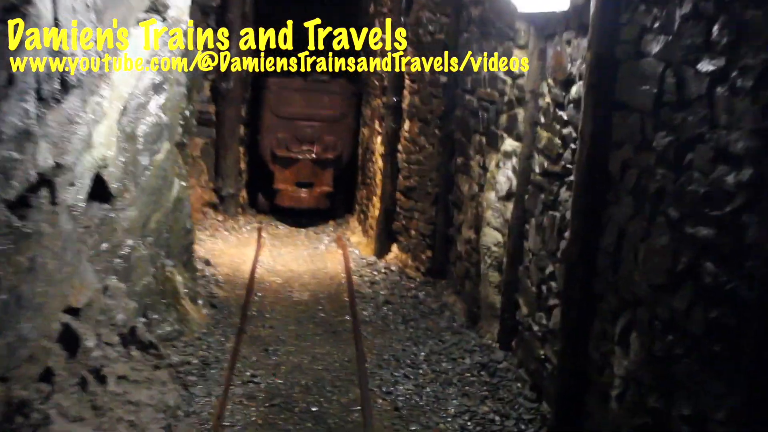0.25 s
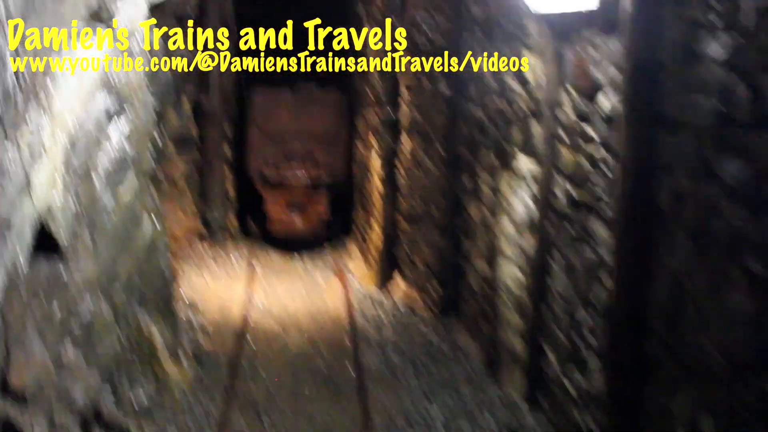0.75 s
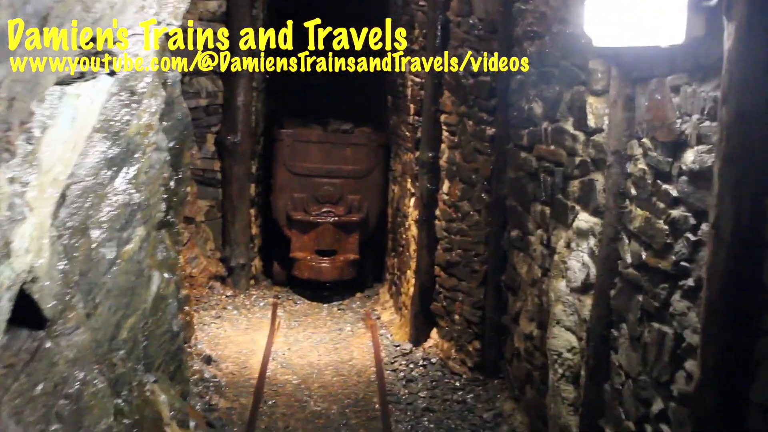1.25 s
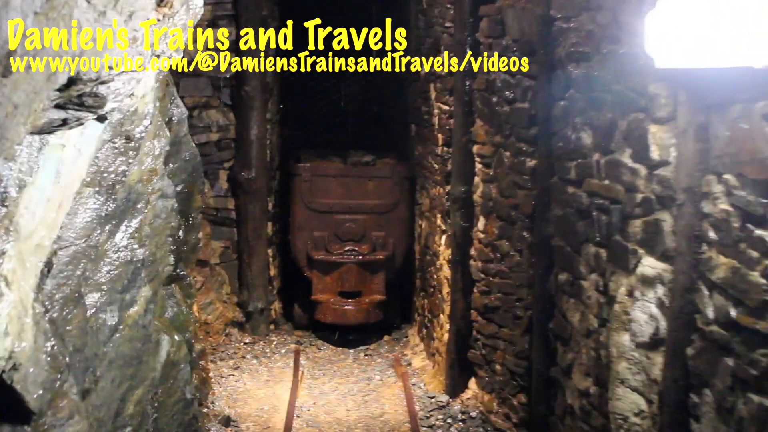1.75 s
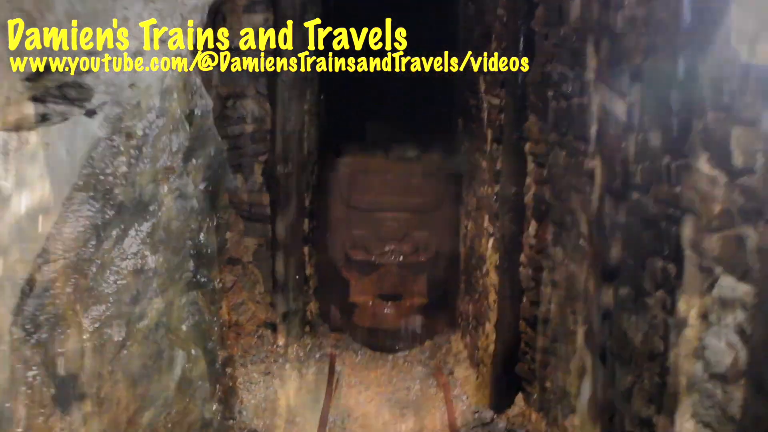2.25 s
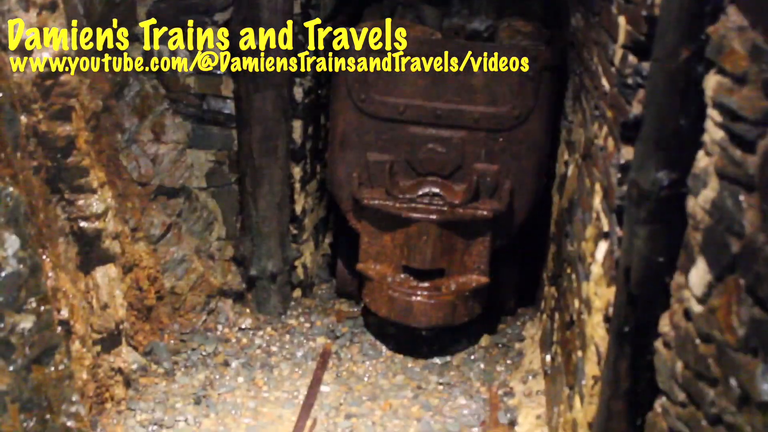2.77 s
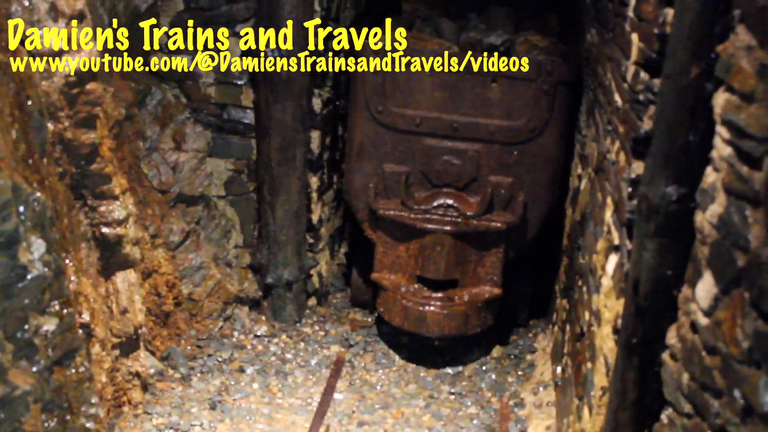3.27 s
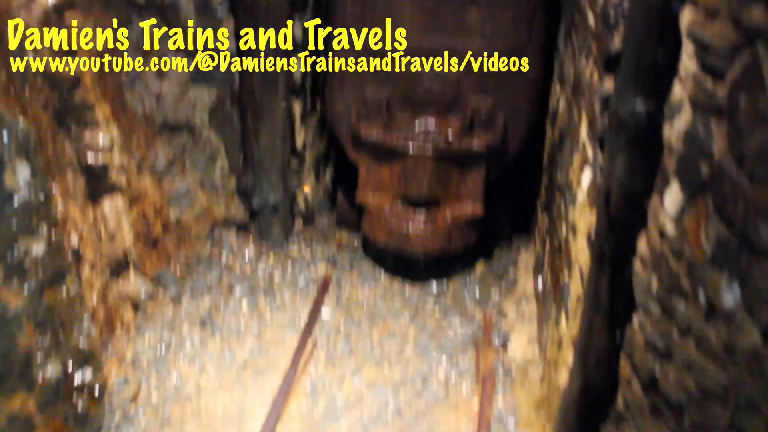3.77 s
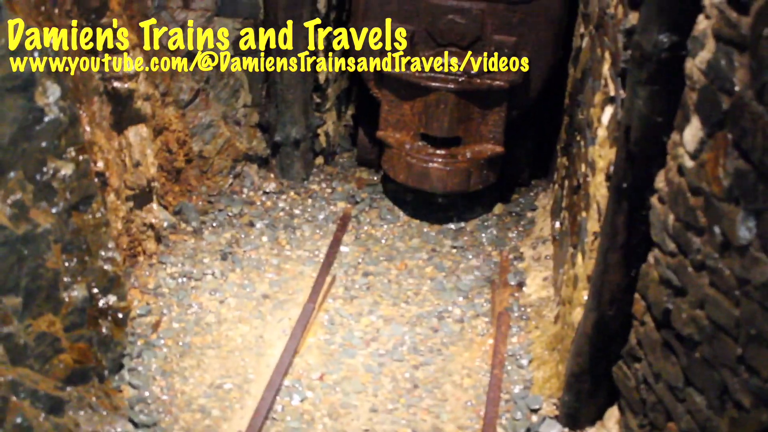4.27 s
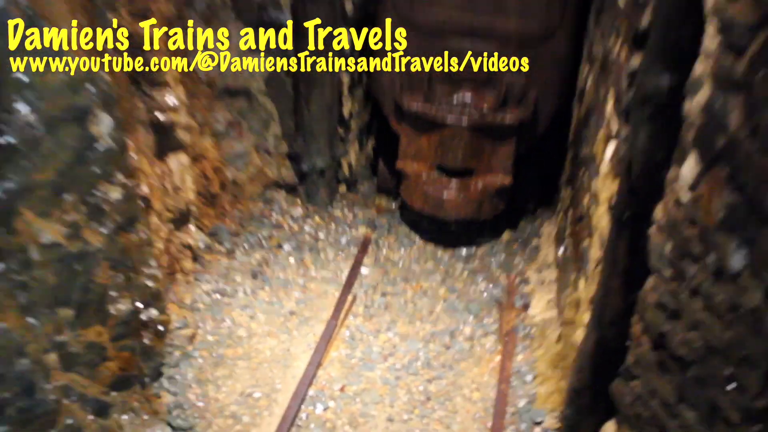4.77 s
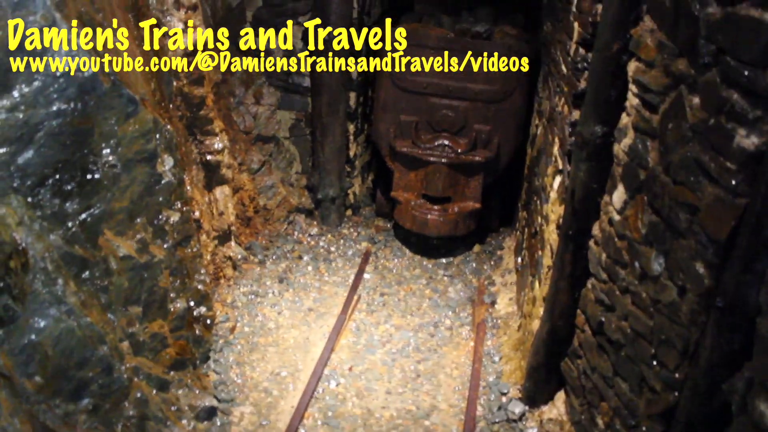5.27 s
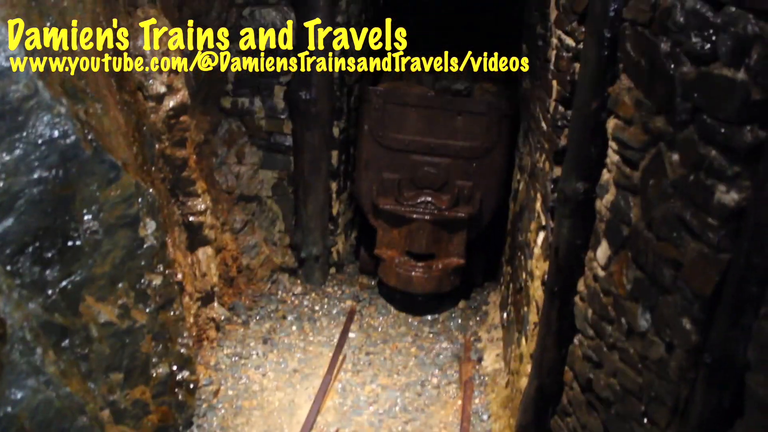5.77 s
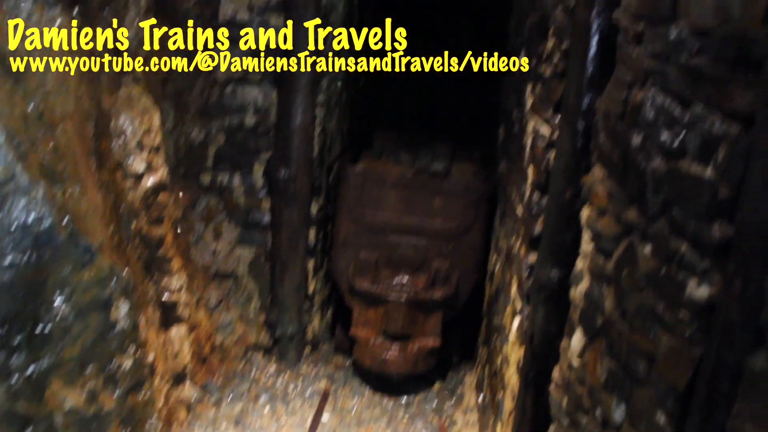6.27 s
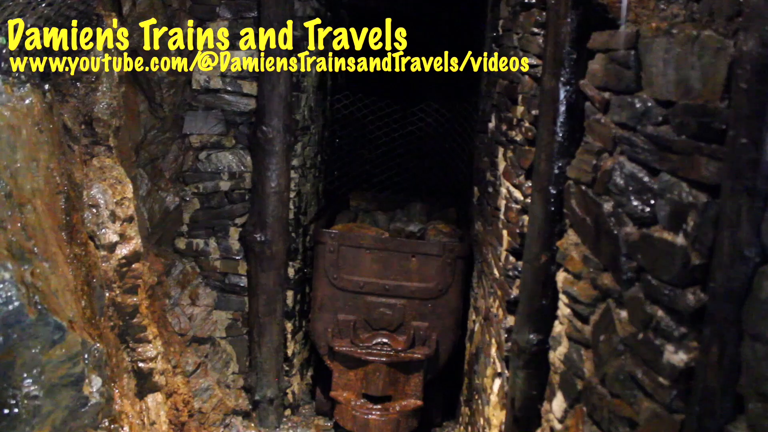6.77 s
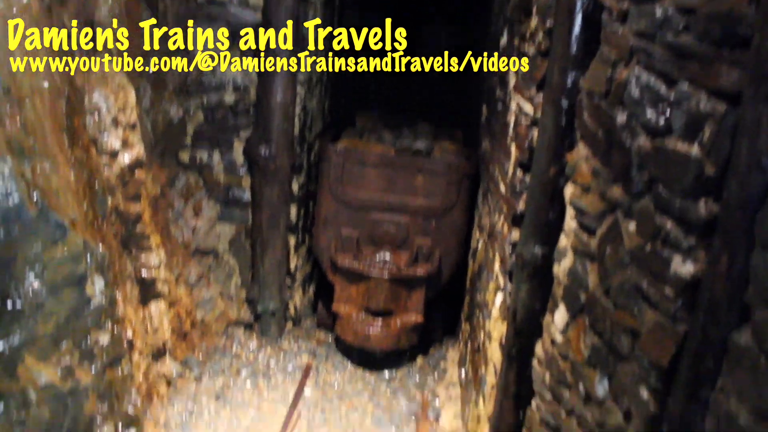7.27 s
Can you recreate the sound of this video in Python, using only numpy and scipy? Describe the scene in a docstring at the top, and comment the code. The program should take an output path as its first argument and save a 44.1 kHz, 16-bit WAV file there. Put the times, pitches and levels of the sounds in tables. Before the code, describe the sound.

Splashing steps on wet gravel open the scene for about two seconds, then stop. Irregular water drops take over, sharp ticks on stone and small rising plinks in puddles, over a soft wash of distant dripping. One loud drop and muffled handling knocks come past the middle; light scuffs and busier drips end it. Mono handheld camera, tight reverberant tunnel.

```python
"""Water drips in a narrow stone mine tunnel: noise bursts smack on rock and gravel, rising sines plink in puddles.
Four splashing steps on wet gravel, then soft scuffs and a spatter, are built from clouds of tiny decaying grains.
Fingers bump (damped sines, noise thuds) and rub (filtered noise) the camera; low noise is air at the microphone.
Close walls answer drips and steps at once, the long bore rings longer; far drips merge into a soft wash."""
import sys
import numpy as np
from scipy import signal
from scipy.fft import rfft, irfft, next_fast_len
from scipy.io import wavfile
from scipy.ndimage import map_coordinates

SR = 44100
rng = np.random.default_rng(int(sys.argv[2]) if len(sys.argv) > 2 else 0)


def persist_wave(psi):
    """Save psi, clipped to +-1, as 16-bit WAV."""
    counts = np.round(np.clip(psi, -1, 1) * 32767).astype(np.int16)
    wavfile.write(sys.argv[1], SR, np.atleast_2d(counts).T)


N = 332073
TOP_HZ = 15900  # upper limit of grain pitch and of the camera's band
STEP_HOLD = 0.09  # share of a step's length spent at full weight


def amp(db):
    """Decibels to gain."""
    return 10 ** (np.asarray(db) / 20)


def unit(x):
    """x at rms 1."""
    return x / np.sqrt(np.mean(x ** 2) + 1e-20)


def along(points, hz):
    """(Hz, value) points interpolated on a log frequency axis."""
    point_hz, value = np.transpose(points)
    return np.interp(np.log(hz + 1), np.log(point_hz), value)


def level_curve(rows, outside_db=None):
    """Gain per sample from (s, dB) rows, interpolated in dB."""
    s, db = np.transpose(rows)
    return amp(np.interp(np.arange(N) / SR, s, db, outside_db, outside_db))


def wobble(knots_per_s):
    """A smooth random curve through normally distributed knots."""
    knots = rng.standard_normal(int(N * knots_per_s / SR) + 4)
    return map_coordinates(knots, [np.arange(N) * knots_per_s / SR])


def filtered(x, response):
    """x times a response of frequency."""
    size = next_fast_len(len(x) + SR // 4)
    spectrum = rfft(x, size) * response(np.fft.rfftfreq(size, 1 / SR))
    return irfft(spectrum, size)[:len(x)]


def coloured(x, spectrum):
    """x shaped by (Hz, dB) points, at rms 1."""
    return unit(filtered(x, lambda hz: amp(along(spectrum, hz))))


def add(track, s, sound):
    """Mix a sound into the track at time s."""
    part = track[max(round(s * SR), 0):][:len(sound)]
    part += sound[:len(part)]


def at_level(sound, db):
    """Scale a sound so that its first 20 ms have this rms level."""
    return amp(db) * sound / np.sqrt(np.mean(sound[:SR // 50] ** 2))


def dying(t60s):
    """Half a second of noise echo with energy 1; each frequency dies at its own speed."""
    hz, age_s, z = signal.stft(rng.standard_normal(SR // 2), SR, nperseg=256)
    decay = amp(-60 * age_s / along(t60s, hz)[:, None])
    tail = signal.istft(z * decay, SR, nperseg=256)[1]
    return tail / np.linalg.norm(tail)


def tunnel(direct_db, bore_db=-5):
    """Echo path from one spot: direct sound, a quick flurry off the close walls, the longer ring of the bore."""
    # Each row: frequency in Hz, t60 in seconds.
    wall_t60s = [(500, 0.14), (3000, 0.19), (7000, 0.12), (15000, 0.12)]
    bore_t60s = [(200, 0.55), (1000, 0.27), (3500, 0.37), (8000, 0.56), (15000, 0.15)]
    path = dying(wall_t60s) + amp(bore_db) * dying(bore_t60s)
    path[0] += amp(direct_db)
    return path


def standing_waves(x):
    """Resonances across the narrow section add to a few low pitches."""
    # Each row: centre in Hz, width in Hz, added peak in dB.
    cross_modes = [(108.4, 8.4, 11), (323, 12.3, -1), (600, 11.4, -24), (849, 102, 1), (944, 47, -1),
                   (1082, 15, -7)]

    def response(f):
        total = 1
        for hz, width_hz, db in cross_modes:
            damping = 1j * f * width_hz
            total = total + amp(db) * damping / (hz * hz - f * f + damping)
        return total

    return filtered(x, response)


def grains(rate_per_s, low_hz, spread_db, direct_db, cycles=2.3, spots=4):
    """Random tiny impacts, each with its own brief pitch and size, from several spots in the tunnel."""
    out, k = np.zeros(N), np.arange(256)
    for _ in range(spots):
        draws = rng.random((int(rate_per_s * N / SR / spots), 4))
        when, pitch, chance, phase = draws.T[:, :, None]
        hz = low_hz * (TOP_HZ / low_hz) ** pitch
        # high grains are fewer per Hz and shorter, so they are made stronger
        size = hz * amp(spread_db * np.minimum(-np.log(1 - chance), 3))
        turns = hz * k / SR
        envelope = np.exp(-turns / cycles) * (1 - k / len(k))
        ring = size * np.sin(2 * np.pi * (turns + phase)) * envelope
        ticks = np.bincount(((when * N).astype(int) + k).ravel(), ring.ravel(), N)[:N]
        out += signal.fftconvolve(ticks, tunnel(direct_db))[:N]
    return unit(out)


def plink(hz, cycles=23, rise=0.38, swell_cycles=1.44):
    """A trapped air bubble swells, rings and climbs in pitch as it nears the surface."""
    turns = hz * np.arange(SR // 12) / SR
    age = turns / cycles
    pitch = 1 + rise * (np.minimum(age, 1) - 1 / 4)  # hz is passed at age 1/4
    envelope = amp(-32 * age) * (1 - np.exp(-turns / swell_cycles))
    return np.sin(2 * np.pi * np.cumsum(pitch) * hz / SR) * envelope


def bubbles(table, direct_db, trim_db):
    """Ring each bubble along its own echo path."""
    out = np.zeros(N)
    for s, db, hz in table:
        heard = signal.fftconvolve(plink(hz), tunnel(direct_db, bore_db=-5.5))
        add(out, s, at_level(heard, db + trim_db))
    return out


def swell(s, rise_db_per_s, hold_s, fall_db_per_s):
    """A gain that rises to 1 at time s, holds, then dies away."""
    t = np.arange(N) / SR - s
    rise_db = rise_db_per_s * np.minimum(t, 0)
    fall_db = fall_db_per_s * np.maximum(t - hold_s, 0)
    return amp(np.maximum(rise_db - fall_db, -120))


def stroke(s, build_s, release_s, edge_db=-17):
    """A rounded gain peaking at 1 at time s, at edge_db one build-up before and one release after."""
    t = np.arange(N) / SR - s
    return amp(np.maximum(edge_db * (t / np.where(t < 0, build_s, release_s)) ** 2, -120))


def tread(s, length_s):
    """Weight comes down fast, is full at time s and eases off; loose stones shift faintly around it."""
    # rises and falls in dB per step length
    rise_db, fall_db, settle_fall_db, settle_peak_db = 61, 20.5, 8, -11.5
    hold_s = STEP_HOLD * length_s
    press = swell(s, rise_db / length_s, hold_s, fall_db / length_s)
    settle = swell(s, 2 * settle_fall_db / length_s, hold_s, settle_fall_db / length_s)
    return np.hypot(press, amp(settle_peak_db) * settle)


def air():
    """Air stirs against the microphone: low noise with a wandering level."""
    # Each row: time in seconds, level in dB, around which the level wanders.
    sway_level = [(0, -48), (1.8, -47.5), (2.6, -56), (5.3, -48.5), (6.1, -53), (7.53, -52.5)]
    # Each row: frequency in Hz, gain in dB.
    rumble_spectrum = [(6, -24.5), (14, 1), (24, -6.5), (40, -18), (70, -15.5), (170, -21), (300, -36),
                       (700, -64)]
    rumble = coloured(rng.standard_normal(N), rumble_spectrum)
    return level_curve(sway_level) * amp(1.6 * wobble(3.22)) * rumble


def wash(murmur_trim_db=-2.0, patter_trim_db=-1.5, hiss_trim_db=-6):
    """Far dripping: a hollow noise murmur, a fine patter of grains and a smooth hiss."""
    # Each row: time in seconds, level in dB before the trims.
    murmur_level = [(0.0, -46), (1.2, -47.5), (1.5, -43.5), (2.3, -48), (2.82, -52.5), (3.55, -49),
                    (3.9, -54), (4.35, -45), (4.68, -57), (5.8, -55.5), (6.3, -49.5), (6.75, -47),
                    (7.53, -55.5)]
    patter_level = [(0, -44), (1.1, -52), (1.6, -47), (2.4, -51.5), (3.5, -46.5), (3.8, -53), (4.3, -47),
                    (5.3, -50.5), (6.9, -47), (7.53, -49.5)]
    # Each row: frequency in Hz, gain in dB.
    murmur_spectrum = [(70, -20.5), (160, -0.5), (240, 0), (400, 0.5), (680, -0.5), (850, -1.5),
                       (1000, -1.5), (1250, -3), (1700, -2.5), (3000, -24)]
    patter_spectrum = [(900, -8.5), (1700, -6), (2500, 0.5), (3400, 2), (5000, -1), (7000, -4.5),
                       (11000, -6.5), (16000, -10)]
    murmur = amp(murmur_trim_db + wobble(8.4)) * coloured(rng.standard_normal(N), murmur_spectrum)
    ticking = grains(rate_per_s=260, low_hz=1225, spread_db=3, direct_db=-7.5)
    patter = amp(patter_trim_db) * coloured(ticking, patter_spectrum)
    hiss = amp(hiss_trim_db) * coloured(rng.standard_normal(N), patter_spectrum)
    return level_curve(murmur_level) * murmur + level_curve(patter_level) * (patter + hiss)


def handling(attack_s=0.001, ring_trim_db=1, thud_trim_db=-4, thud_t60_s=0.061):
    """Finger bumps (damped modes, noise thuds) and a rub reach the microphone through the housing, no echo."""
    # Each row: start in seconds, level in dB before the trims, pitch in Hz, t60 in seconds.
    bump_rows = [(3.733, -30.5, 94.4, 0.15), (3.735, -37, 317, 0.14), (4.313, -36, 49.5, 0.38),
                 (4.382, -29.5, 93, 0.21), (4.385, -31, 294, 0.032), (5.053, -16.5, 240, 0.051),
                 (5.078, -22.5, 190, 0.066), (5.259, -42.5, 101, 0.18), (6.704, -29, 103, 0.13),
                 (6.703, -29, 180, 0.039)]
    # Each row: time in seconds, level in dB of a finger sliding on the housing.
    rub_level = [(4.66, -47), (4.73, -39.5), (5.04, -42), (5.12, -58)]
    # Each row: frequency in Hz, gain in dB.
    finger_spectrum = [(30, 2), (90, -8), (150, 1), (200, 1.5), (260, 1), (340, -13.5), (600, -24),
                       (1500, -37)]
    noise_gain = level_curve(rub_level, outside_db=-120)
    rings, t = np.zeros(N), np.arange(SR // 3) / SR
    onset = 1 - np.exp(-t / attack_s)
    for s, db, hz, t60_s in bump_rows:
        ring = amp(db + ring_trim_db - 60 * t / t60_s) * np.sin(2 * np.pi * hz * t)
        add(rings, s, ring * onset)
        thud_gain = amp(db + thud_trim_db - 60 * t / min(t60_s, thud_t60_s))
        add(noise_gain, s, thud_gain * onset)
    return rings + noise_gain * coloured(rng.standard_normal(N), finger_spectrum)


def footsteps(spray_rise_db=300, spray_fall_db=26):
    """The sole slaps into wet gravel, stones grind together, water squelches and sprays out; soft scuffs follow."""
    # Each row: moment of full weight in seconds, sole, gravel crunch and spray levels in dB,
    # crunch and spray delays in seconds, length in seconds.
    step_rows = [(0.144, -29.5, -28, -35.5, 0.0057, -0.029, 0.21),
                 (0.804, -32.5, -27, -39, 0.027, 0.0077, 0.17),
                 (1.421, -37.5, -34, -40.5, 0.0059, -0.032, 0.26),
                 (2.134, -38.5, -33, -44.5, 0.0, -0.015, 0.087)]
    # Soft scuffs of shoes on gravel; the one at 4.84 s is spatter after the loud drop.
    # Each row: strongest moment in seconds, low and high grain levels in dB,
    # build-up and release in seconds.
    soft_rows = [(3.04, -44, -48.5, 0.17, 0.13), (4.159, -40, -40, 0.072, 0.11),
                 (4.84, -49, -45, 0.15, 0.2), (5.05, -43, -48, 0.06, 0.083),
                 (6.355, -42.5, -48.5, 0.075, 0.11), (6.725, -41.5, -62, 0.033, 0.2),
                 (7.115, -39.5, -44, 0.095, 0.087)]
    # Water with trapped air squeezed from under the sole.
    # Each row: start in seconds, level in dB before the trim, nominal pitch in Hz.
    squelch_rows = [(0.151, -30.5, 996), (0.197, -27, 1157), (0.220, -29, 1560), (0.276, -36, 2700),
                    (0.807, -24, 2260), (0.852, -27, 2570), (1.411, -33, 3650), (1.433, -36, 970)]
    # Each row: frequency in Hz, gain in dB.
    sole_spectrum = [(80, -34), (200, -9.5), (450, -4.5), (680, -1.5), (850, -5), (1050, -5), (1300, -9),
                     (1700, -7.5), (2400, -13), (6000, -60)]
    crunch_spectrum = [(900, -2), (1700, -10), (2300, 0.5), (3400, 1), (5200, -5), (7000, -13.5),
                       (10000, -23)]
    spray_spectrum = [(3500, -2), (6500, 2), (8000, -2.5), (10500, -1), (13000, -11), (16000, -14)]
    scuff_spectrum = [(100, -8.5), (300, -5), (600, 0), (880, -2.5), (1300, -5.5), (2400, -10),
                      (4500, -14.5), (8000, -25.5), (15000, -27)]
    sole = coloured(grains(rate_per_s=1200, low_hz=197.0, spread_db=3.0, direct_db=-5), sole_spectrum)
    crunch = coloured(grains(rate_per_s=800, low_hz=1200, spread_db=4, direct_db=-1), crunch_spectrum)
    spray = coloured(grains(rate_per_s=800, low_hz=4500, spread_db=3, direct_db=-3), spray_spectrum)
    scuff = coloured(grains(rate_per_s=1400, low_hz=258, spread_db=7.0, direct_db=-7.5), scuff_spectrum)
    out = bubbles(squelch_rows, direct_db=-7, trim_db=-3.0)
    for s, sole_db, crunch_db, spray_db, crunch_delay_s, spray_delay_s, length_s in step_rows:
        out += amp(sole_db) * tread(s, length_s) * sole
        out += amp(crunch_db) * tread(s + crunch_delay_s, length_s) * crunch
        # spray bursts out abruptly and dies sooner than the crunch; slopes in dB per step length
        burst = swell(s + spray_delay_s, spray_rise_db / length_s, STEP_HOLD * length_s,
                      spray_fall_db / length_s)
        out += amp(spray_db) * burst * spray
    for s, low_db, high_db, build_s, release_s in soft_rows:
        mix = amp(low_db) * scuff + amp(high_db) * crunch
        out += stroke(s, build_s, release_s) * mix
    return out


def far_puddles(count=130, middle_hz=3700, octaves=0.522, level_db=-54):
    """Faint plinks of uneven size and pitch from further down the tunnel."""
    out = np.zeros(N)
    starts_s = rng.uniform(0, N / SR, count)
    draws = np.clip(rng.standard_normal((count, 2)), -2, 2)
    for s, (pitch, size) in zip(starts_s, draws):
        bubble = plink(middle_hz * 2 ** (octaves * pitch))
        heard = signal.fftconvolve(bubble, tunnel(direct_db=-10))
        add(out, s, at_level(heard, level_db + 2 * size))
    return out


def puddles():
    """Drops fall into the near puddles and the trapped bubbles plink."""
    # Each row: start in seconds, level in dB before the trim, nominal pitch in Hz.
    bubble_rows = [(1.576, -41, 1510), (1.761, -34, 1172), (2.226, -44.5, 2410), (2.257, -44, 3450),
                   (2.336, -50, 926), (2.592, -40.5, 2600), (2.535, -49, 3160), (3.094, -41, 2870),
                   (3.192, -40, 1830), (3.209, -44, 5200), (3.543, -48.5, 1520), (3.853, -45.5, 1620),
                   (3.88, -41.5, 3280), (3.923, -48.5, 1900), (4.863, -42, 2380), (5.944, -40.5, 3420),
                   (5.957, -40.5, 2940), (5.97, -45, 1070), (6.207, -37, 2130), (6.235, -42.5, 1570),
                   (6.313, -39.5, 2550), (6.536, -39.5, 3560), (6.865, -40, 1530), (6.908, -39.5, 3780),
                   (6.929, -37.5, 3580), (7.155, -44, 3400), (7.302, -40.5, 3400), (7.327, -41, 874),
                   (7.349, -38.5, 2740)]
    return bubbles(bubble_rows, direct_db=-2, trim_db=0.5)


def far_drops(count=24, level_db=-47.5, spread_db=6.0, middle_hz=4300, octaves=0.21, half_width_octaves=0.92):
    """Rows for fainter drops, which fall at random on stone further off."""
    when, size, pitch = rng.random((count, 3)).T
    starts_s = (np.arange(count) + when) * N / SR / count
    levels_db = level_db + spread_db * (2 * size - 1)
    centres_hz = middle_hz * 2 ** (octaves * (2 * pitch - 1))
    return [(s, db, hz, half_width_octaves) for s, db, hz in zip(starts_s, levels_db, centres_hz)]


def drops(smack_s=0.001, direct_db=1, nearness=1.0, tick=0.068, dull_hz=13500, snap=3.7):
    """Each impact snaps and bursts in a millisecond, coloured by the spot it hits; quieter ones are wetter."""
    # Near drops striking stone, and brief splashes and scrapes of the heel on wet gravel
    # (0.108, 0.745 and 1.379 s).
    # Each row: start in seconds, level in dB, centre in Hz, half-width in octaves.
    impact_rows = [(0.108, -34.5, 4960, 0.27), (0.532, -40, 1360, 0.86), (0.696, -44.5, 8150, .2),
                   (0.745, -39, 5500, 0.92), (0.965, -34.5, 1470, 0.71), (1.171, -46, 4560, 1.7),
                   (1.236, -46, 5200, 1.5), (1.379, -41, 9500, 0.83), (1.983, -41.5, 1350, .7),
                   (2.053, -39.5, 3190, 0.81), (2.293, -41.5, 3440, 0.54), (2.702, -36, 12600, 0.5),
                   (2.797, -46.5, 5540, 1.4), (3.009, -40.5, 4450, 0.39), (3.133, -40, 3370, 0.95),
                   (3.2797, -27, 7000, 0.92), (3.641, -40, 1650, 1.26), (3.903, -40.5, 3240, 0.98),
                   (3.971, -33.5, 5800, 0.77), (4.195, -32.5, 3030, 1), (4.411, -43, 3400, 0.79),
                   (4.579, -40, 3650, 0.48), (4.801, -25, 3170, 1.03), (5.028, -35, 4540, 1.7),
                   (5.245, -36.5, 3120, 0.62), (5.359, -44, 4100, 0.56), (5.535, -41, 4600, 5.7),
                   (5.601, -40, 5900, 0.67), (5.824, -43, 6100, 1), (5.912, -42, 4200, 3.8),
                   (6.022, -41.5, 3960, 0.77), (6.154, -31, 2400, 0.55), (6.294, -37, 3680, 0.85),
                   (6.438, -42, 3880, 0.44), (6.759, -28.5, 4650, 0.37), (6.856, -36, 1810, 2),
                   (7.320, -36.5, 2520, 1.5)]
    out, t = np.zeros(N), np.arange(SR // 200) / SR
    loudest_db = max(row[1] for row in impact_rows)
    for s, db, centre_hz, octaves in impact_rows + far_drops():
        smack = rng.standard_normal(len(t)) * np.exp(-t / smack_s) + snap * (t == 0)
        path = tunnel(direct_db + nearness * (db - loudest_db))
        heard = np.pad(signal.fftconvolve(smack, path), (SR // 2000, 0))

        def colour(hz):
            band = 1 / np.sqrt(1 + np.abs(np.log2((hz + 1) / centre_hz) / octaves) ** 6)
            broad_tick = tick * hz / (hz + 500)
            # the film of water softens the very top
            return (band + broad_tick) / np.sqrt(1 + (hz / dull_hz) ** 6)

        add(out, s, at_level(filtered(heard, colour), db))
    return out


def scene():
    """One microphone feeds both channels; handling and air bypass the tunnel."""
    in_tunnel = wash() + footsteps() + far_puddles() + puddles() + drops()
    mono = standing_waves(in_tunnel) + handling() + air()
    return np.array([mono, mono])


def record(dry):
    """The camera keeps nothing above its band limit."""
    return np.array([filtered(channel, lambda hz: hz < TOP_HZ) for channel in dry])


dry = scene()
out = record(dry)
persist_wave(out)
```